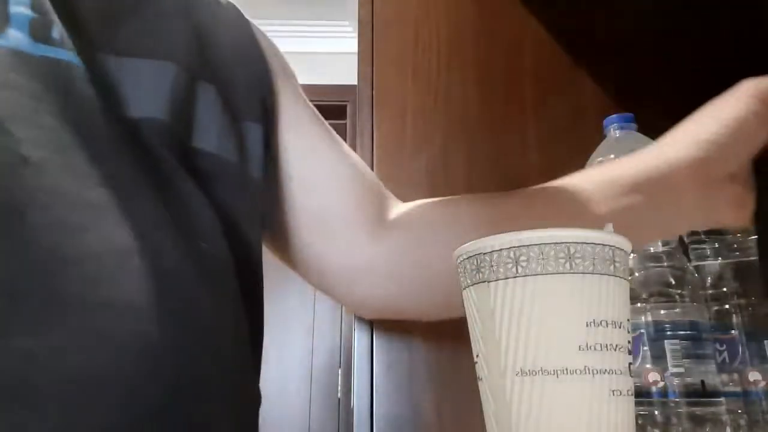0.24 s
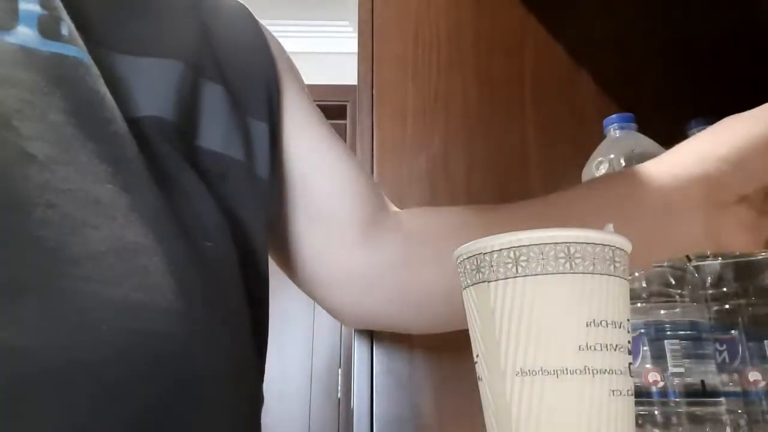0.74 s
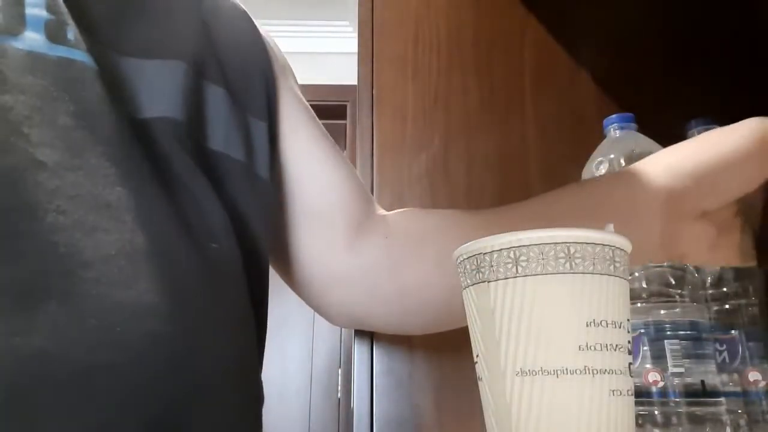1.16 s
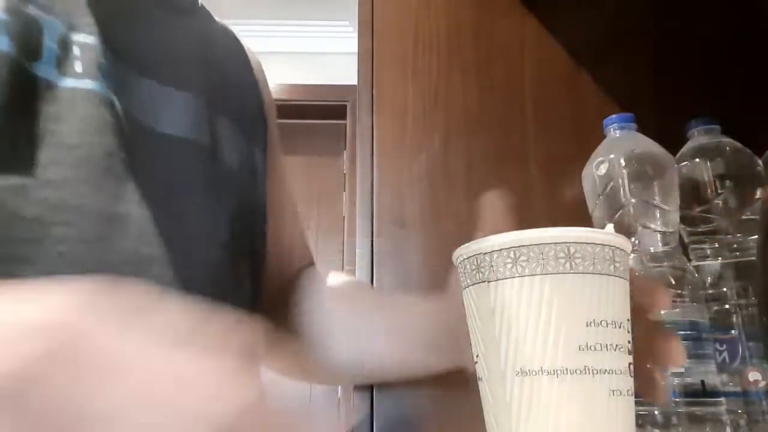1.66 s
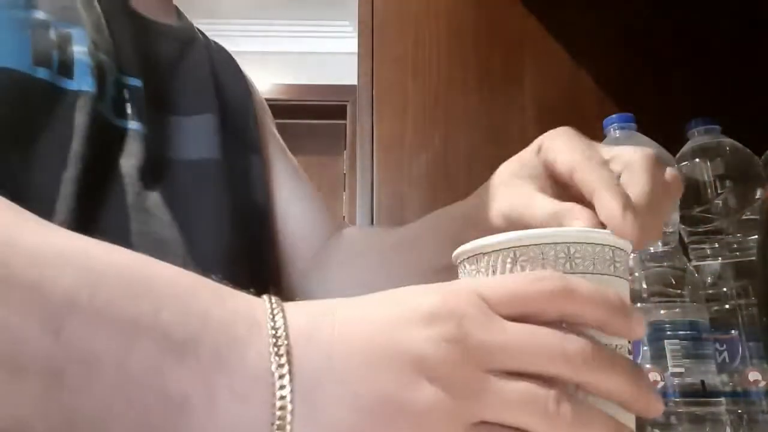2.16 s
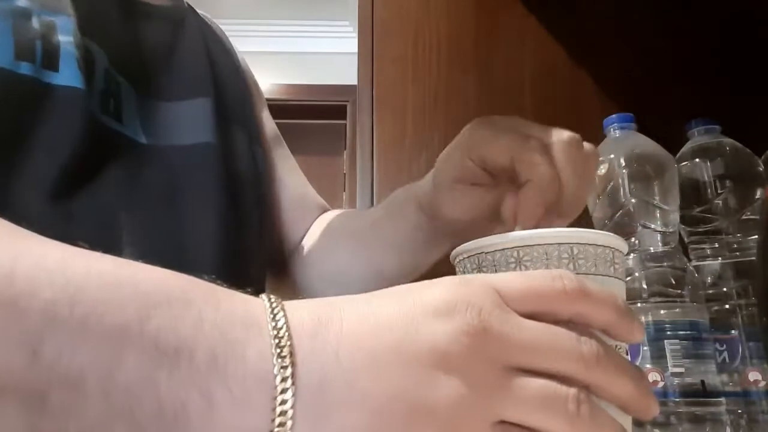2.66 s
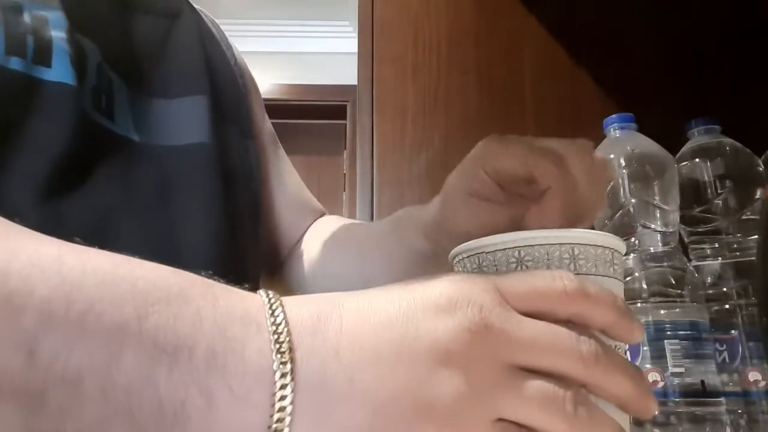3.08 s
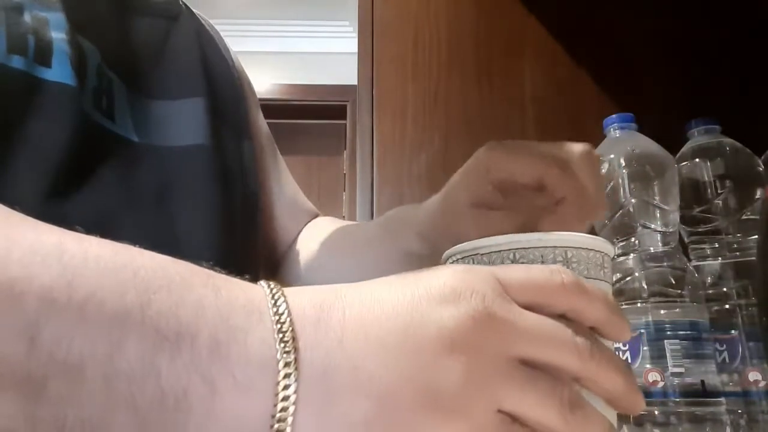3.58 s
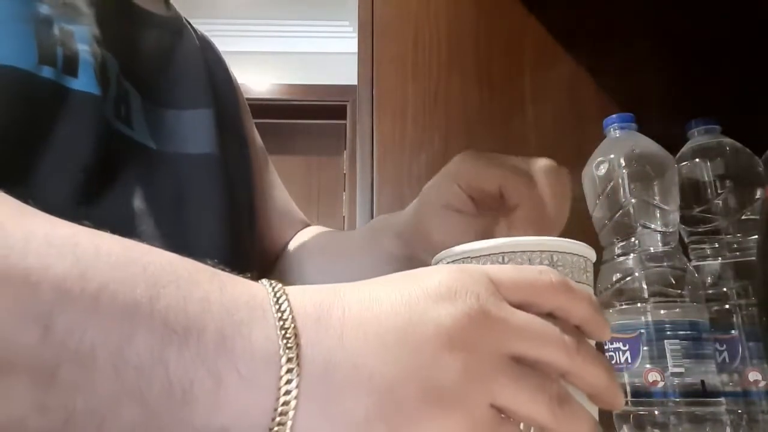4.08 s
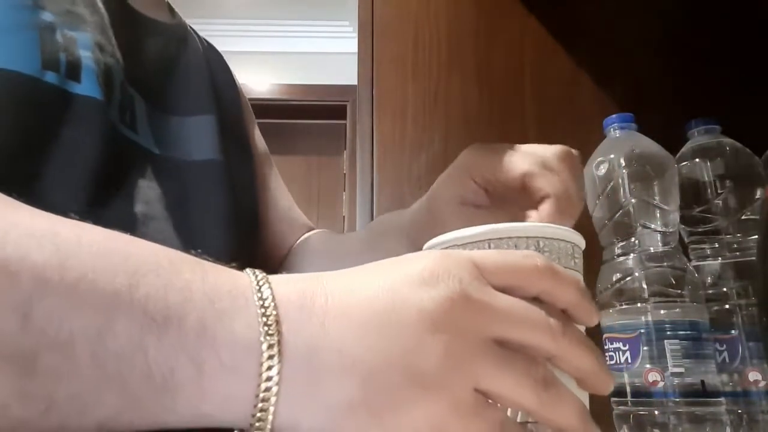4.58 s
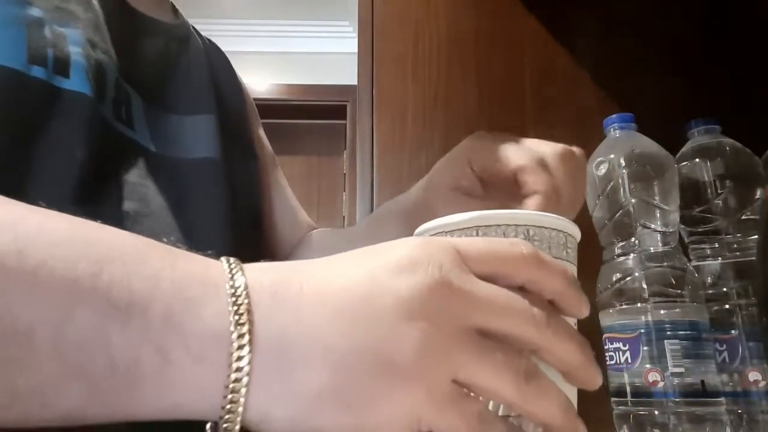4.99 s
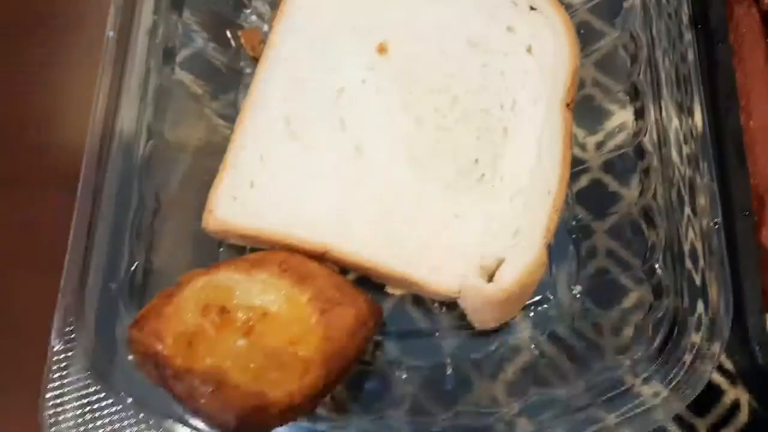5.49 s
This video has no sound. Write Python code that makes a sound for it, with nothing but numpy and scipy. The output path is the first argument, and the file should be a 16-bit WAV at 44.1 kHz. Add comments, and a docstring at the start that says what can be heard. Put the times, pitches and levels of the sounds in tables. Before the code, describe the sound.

A metal kettle clatters and thumps onto its base, then a light stick softly stirs water in a paper cup, ending on an abruptly cut knock.

```python
"""At a wooden counter in a small furnished room, a metal electric kettle is fumbled onto its base until it seats.
Each blow layers noise clatter, ringing shell modes and a counter thump; small rattles and slides lie between.
Then water in a paper cup is stirred with a light stick: friction noise and fibre snaps on the wall,
small dull taps, spatters and decaying-sine bubbles. Filtered noise makes the low ventilation rumble and faint hiss.
One last hard knock is cut short as the sound breaks off, then returns much quieter."""
import sys
import numpy as np
from scipy import signal
from scipy.fft import irfft
from scipy.io import wavfile
from scipy.ndimage import uniform_filter1d

SR = 44100
rng = np.random.default_rng(int(sys.argv[2]) if len(sys.argv) > 2 else 0)


def waveform_to_disk(signal):
    """Save audio, clipped to [-1, 1], as 16-bit WAV at the path in sys.argv[1]."""
    frames = np.transpose(np.atleast_2d(signal))
    scaled = np.clip(frames, -1, 1) * 32767
    samples = np.round(scaled).astype(np.int16)
    wavfile.write(sys.argv[1], SR, samples)


N = 253115
TIME = np.arange(N) / SR
SHARP_RISE_S = 0.0005  # onset of the hardest contacts

# likeness of the left and right channels: (frequency [Hz], likeness [0-1])
STEREO_LIKENESS = [(60, 0.98), (300, .93), (700, 0.67), (1300, 0.021), (3000, .15), (7000, 0.013)]
# stereo balance on the kettle side: (frequency [Hz], left minus right [dB])
KETTLE_LEAN = [(60, -2), (600, -3), (1200, 4.5), (2400, 1.5), (8000, 0.5)]
# stereo balance on the cup side: (frequency [Hz], left minus right [dB])
CUP_SIDE_LEAN = [(60, -6), (600, -7.5), (1300, 2.5), (2400, 6), (4400, -0.5), (8000, -0.5)]
# noise colour of the base's clatter: (frequency [Hz], density [dB per Hz])
CLATTER_COLOUR = [(100, -19.5), (190, -15.5), (270, 5), (440, 2), (700, -9.5), (930, -3.5), (1300, -19),
                  (1700, -13.5), (2650, -13.5), (3050, -23.5), (3900, -23), (8200, -26.5), (9400, -46),
                  (11500, -34), (15500, -47.5)]
# noise colour of rubbed paper: (frequency [Hz], density [dB per Hz])
PAPER_COLOUR = [(240, -19), (420, -4), (780, -5), (1100, -1.5), (2300, -6.5), (2900, -11), (3500, -4),
                (4500, -11.5), (8200, -10), (9300, -28.5), (11500, -21), (15500, -30.5)]
# noise colour of the cabinet under the counter: (frequency [Hz], density [dB per Hz])
CABINET_COLOUR = [(30, -24), (65, -1), (130, 0), (220, -21), (600, -55.5)]


def amp(db):
    """Decibels to gain."""
    return 10 ** (np.asarray(db) / 20)


def unit(x):
    """Scales to rms 1."""
    return x / np.sqrt(np.mean(x ** 2) + 1e-20)


def at_hz(points, hz):
    """Reads a table on a log-frequency axis."""
    f, value = np.transpose(points)
    return np.interp(np.log(hz + 1), np.log(f + 1), value)


def level(points):
    """Turns (time [s], level [dB]) points into a gain for every sample."""
    return amp(np.interp(TIME, *np.transpose(points)))


def add(mix, s, sound):
    """Mixes a sound into the stereo mix at time s, in place."""
    part = mix[:, round(s * SR):][:, :sound.shape[1]]
    part += sound[:, :part.shape[1]]


def tilt(hz, slope):
    """Brightness of a contact: slope dB per octave around 800 Hz, flat outside 300-8000 Hz."""
    return amp(slope * np.log2(np.clip(hz, 300, 8000) / 800))


def noise(colour, size, lean, slope=0):
    """Coloured stereo noise at rms 1, whose channels agree mostly in the bass."""
    hz = np.fft.rfftfreq(size, 1 / SR)
    a, b = np.exp(2j * np.pi * rng.random((2, len(hz))))  # random phases
    same = np.clip(at_hz(STEREO_LIKENESS, hz), -1, 1)
    pair = np.array([a, same * a + np.sqrt(1 - same ** 2) * b])
    balance = amp(np.outer([0.5, -0.5], at_hz(lean, hz)))
    low_cut = hz ** 2 / (hz ** 2 + (colour[0][0] / 2) ** 2)
    spectrum = amp(at_hz(colour, hz)) * tilt(hz, slope) * low_cut
    return unit(irfft(pair * balance * spectrum, size))


def burst(colour, lean, slope, t60, rise, size=16384):
    """A contact heard as dense resonances: coloured noise that swells at once and dies together."""
    t = np.arange(size) / SR
    return noise(colour, size, lean, slope) * amp(-60 * t / t60) * (1 - np.exp(-t / rise))


def ring(modes, slope, rise, damping=1, uneven_db=0, size=16384):
    """Struck modes as decaying sines, detuned at random, with uneven_db varying their strength by the spot hit."""
    t, out = np.arange(size) / SR, np.zeros((2, size))
    for hz, db, t60 in modes:
        start, detune, apart, spot = rng.uniform(-1, 1, 4)
        # the less alike the channels, the further apart their phases
        spread = np.arccos(np.clip(at_hz(STEREO_LIKENESS, hz), -1, 1)) * np.sign(apart)
        phase = np.pi * start + np.array([[0], [spread]])
        wave = np.sin(2 * np.pi * hz * (1 + 0.0076 * detune) * t + phase)
        balance_db = np.array([[0.5], [-0.5]]) * at_hz(KETTLE_LEAN, hz)
        decay_db = -60 * damping * t / t60
        out += wave * amp(db + uneven_db * spot + decay_db + balance_db) * tilt(hz, slope)
    return out * (1 - np.exp(-t / rise))


def grain(rough_db, size):
    """A random gain that wanders at rms 1, smoothed over size samples."""
    drift = unit(uniform_filter1d(rng.standard_normal(N), size))
    return unit(amp(rough_db * np.clip(drift, -2.5, 2.5)))


def wander(x, patchy_db):
    """Makes different parts of the spectrum stand out from moment to moment, by smoothed random patches."""
    z = signal.stft(x, SR, nperseg=512)[2]
    patches = uniform_filter1d(rng.standard_normal(z.shape[1:]), size=4, axis=0)  # across frequency
    patches = unit(uniform_filter1d(patches, size=7, axis=1))  # across time
    return signal.istft(z * amp(patchy_db * patches), SR, nperseg=512)[1][:, :N]


def room(x, wet_db):
    """Adds the diffuse tail of a small furnished room: noise that decays at its own rate in each band."""
    # reverberation time: (frequency [Hz], t60 [s])
    reverb_t60 = [(100, 0.16), (400, 0.4), (1500, 0.2)]
    flat = [(60, 0), (16000, 0)]
    wash = noise(flat, 32768, flat)
    hz, t, z = signal.stft(wash, SR, nperseg=256)
    decay = amp(-60 * t / at_hz(reverb_t60, hz)[:, None])
    build_up = 1 - np.exp(-t / 0.0078)
    tail = signal.istft(z * decay * build_up, SR, nperseg=256)[1]
    tail = tail / np.linalg.norm(tail[0])
    return x + amp(wet_db) * signal.fftconvolve(x, tail, axes=1)[:, :N]


def ventilation():
    """A low rumble of filtered noise that swells a little by chance, with a faint drifting hiss above it."""
    # rumble colour: (frequency [Hz], density [dB per Hz])
    air_colour = [(12, -44), (20, -11), (80, 3), (119, 3), (185, -19.5), (315, -14), (452, -29), (857, -33),
                  (1270, -46), (2540, -47), (4550, -56), (9130, -56), (15500, -48.5)]
    # hiss colour: (frequency [Hz], density [dB per Hz])
    hiss_colour = [(5500, -25), (7900, -0.5), (9500, -24.5)]
    # drift of the hiss: (time [s], level [dB])
    hiss_drift = [(1.45, -1), (1.62, 6), (1.85, 0)]
    bass_db, upper_db, hiss_db = -54, -52.5, -88.5
    rumble = noise(air_colour, N, CUP_SIDE_LEAN)
    bass = signal.sosfiltfilt(signal.butter(2, 250, fs=SR, output="sos"), rumble)
    swell = grain(rough_db=1.38, size=round(0.4 * SR))
    hiss = amp(hiss_db) * level(hiss_drift) * noise(hiss_colour, N, CUP_SIDE_LEAN)
    upper = amp(upper_db) * (rumble - bass)
    return amp(bass_db) * bass * swell + wander(upper + hiss, patchy_db=3.5)


def stroke(length, taper, build_db=0):
    """Pressure that swells, holds or changes by build_db, and lets go."""
    size = int(length * SR)
    return signal.windows.tukey(size, np.clip(taper, 0, 1)) * amp(build_db * np.linspace(-0.5, 0.5, size))


def crackle(size):
    """Single fibres snap under friction: sparse random impulses of uneven strength."""
    snaps_per_s, spread_db = 700, 2
    snaps = (rng.random(size) < snaps_per_s / SR) * np.sign(rng.standard_normal(size))
    return snaps * amp(spread_db * np.minimum(rng.exponential(1, size), 3))


def rub(rows, taper, build_db=0):
    """Friction noise and snapping fibres under each stroke's pressure, with a weaker trail as contact lets go."""
    trail_s, trail_db, crackle_db = 0.052, -16.5, -1
    keep = np.exp(-1 / (trail_s * SR))
    out = np.zeros((2, N))
    for s, length, db, slope in rows:
        pressure = np.pad(stroke(length, taper, build_db), (0, 16384))[:16384]
        size = len(pressure)
        trail = amp(trail_db) * signal.lfilter([1 - keep], [1, -keep], pressure)
        snap = burst(PAPER_COLOUR, CUP_SIDE_LEAN, slope, t60=0.019, rise=SHARP_RISE_S / 2)
        fibres = unit(signal.oaconvolve(crackle(size)[None], snap, axes=1)[:, :size])
        smooth = noise(PAPER_COLOUR, size, CUP_SIDE_LEAN, slope)
        add(out, s, amp(db) * (pressure + trail) * unit(smooth + amp(crackle_db) * fibres))
    return out


def sliding():
    """The kettle and the hand on it rub briefly: short friction strokes with the paper's noise colour."""
    # rubs: (start [s], length [s], relative level [dB], brightness [dB per octave])
    slides = [(0.015, 0.04, -67.5, -3.5), (0.36, 0.04, -68.5, -1), (0.968, 0.014, -46, -4.5),
              (1.335, 0.095, -54.5, 1)]
    return amp(-2.5) * room(rub(slides, taper=0.93), wet_db=-15.0)


def stick_pickup():
    """The stick is lifted off the counter and clicks with three short woody modes."""
    out = np.zeros((2, N))
    modes = [(1520, 0.5, 0.026), (1936, -3.0, 0.019), (2520, 1.5, 0.015)]  # (frequency [Hz], level [dB], t60 [s])
    add(out, 2.202, amp(-44.5) * ring(modes, 0, rise=0.00042))
    return room(out, wet_db=-5.5)


def last_knock():
    """One hard, close knock: a dry noise burst and a hollow modal ring."""
    # knock colour: (frequency [Hz], density [dB per Hz])
    knock_colour = [(220, -25), (520, 1.5), (800, -7.5), (1080, 1.5), (1350, -8), (2000, -7), (2750, -24.5),
                    (7940, -23), (15000, -60)]
    # hollow ring: (frequency [Hz], level [dB], t60 [s])
    hollow_modes = [(313, -5.5, 0.11), (558, 7, 0.03), (658, 3, 0.07), (1052, 4, 0.033), (1990, -10, 0.025)]
    out = np.zeros((2, N))
    hollow = ring(hollow_modes, 0, rise=SHARP_RISE_S)
    impact = burst(knock_colour, KETTLE_LEAN, 0, t60=0.065, rise=SHARP_RISE_S)
    add(out, 5.456, amp(-26.5) * impact + amp(-30.5) * hollow)
    return out


def cup(x):
    """The paper wall adds a few damped resonances, as peak filters beside the direct sound."""
    # wall resonances: (frequency [Hz], width [Hz], level over the plain sound [dB])
    wall_modes = [(1120, 34, -7.5), (1660, 250, -5.5), (2440, 180, -4.5), (3320, 160, -1), (3680, 140, -5)]
    out = x
    for hz, width, db in wall_modes:
        out = out + amp(db) * signal.lfilter(*signal.iirpeak(hz, hz / width, fs=SR), x)
    return out


def small_taps():
    """Small dull taps, as short noise bursts through the cup filter."""
    # light contacts before the stirring, the stick's pickup click, then stick taps on the cup:
    # (time [s], relative level [dB], brightness [dB per octave])
    taps = [(0.321, -49.5, -7), (1.801, -50.5, -10.5), (2.202, -44, 0), (3.079, -38.5, -6),
            (3.31, -39.5, -4), (3.434, -46.5, -4.5), (3.534, -48.5, -0.5), (3.654, -35, -3),
            (3.973, -34.5, -2), (4.204, -54, -0.5), (4.232, -45, -1), (4.358, -41.5, -1),
            (4.701, -45.5, -3), (5.261, -44.5, -6.5), (5.434, -50, 1)]
    # tap colour: (frequency [Hz], density [dB per Hz])
    tap_colour = [(200, -5), (500, -8.5), (1000, -0.5), (1500, -2.5), (2300, -6.5), (2900, -11.5),
                  (3700, -7.5), (6000, -10.5), (8200, -8), (9400, -31.5), (15000, -24)]
    out = np.zeros((2, N))
    for s, db, slope in taps:
        add(out, s, amp(db) * burst(tap_colour, CUP_SIDE_LEAN, slope, t60=0.057, rise=0.0014))
    return amp(-5.0) * room(cup(out), wet_db=-7.0)


def bubble(hz, cycles, glide):
    """A trapped bubble is a sine that dies in a few cycles, its pitch bent slightly up as it nears the surface."""
    t = np.arange(4096) / SR
    age = t * hz / cycles
    wave = np.sin(2 * np.pi * hz * t * (1 + glide * np.minimum(age, 1)))
    return wave * np.exp(-age) * (1 - np.exp(-t * hz))


def water():
    """Water laps as rough noise; each splash is a short spatter and a bubble, with faint bubbles later on."""
    # water colour: (frequency [Hz], density [dB per Hz])
    water_colour = [(300, 17.5), (600, 0.5), (1600, 3.5), (2800, -13.5), (3350, -5.5), (4700, -25.5),
                    (15000, -27)]
    # splashes: (time [s], level [dB], bubble frequency [Hz])
    splashes = [(2.675, -40.5, 466), (2.688, -43, 660), (2.749, -51, 1090), (2.799, -39.5, 1140),
                (2.841, -40.5, 1256), (2.881, -42, 1180), (3.122, -47.5, 1430), (5.219, -50, 1713)]
    out = np.zeros((2, N))
    # the first turn sets the water moving
    add(out, 2.635, amp(-62) * stroke(0.233, taper=0.28)[None])
    out *= noise(water_colour, N, CUP_SIDE_LEAN) * grain(rough_db=4.5, size=300)
    for s, db, hz in splashes:
        spatter = amp(-8) * burst(water_colour, CUP_SIDE_LEAN, 0, t60=0.035, rise=0.0012)[:, :4096]
        plop = amp([[0], [2]]) * bubble(hz, cycles=2.0, glide=0.0048)  # 2 dB stronger on the right
        add(out, s, amp(db) * (spatter + plop))
    drip_count, first_s, last_s = 69, 3.442, 5.35
    for _ in range(drip_count):
        when = rng.uniform(first_s, last_s)
        strength, pitch = rng.uniform(-0.44, 1, 2)
        drip = bubble(1300 * 2 ** (0.45 * pitch), cycles=1.0, glide=0.019)
        add(out, when, amp(-65 + 2.5 * strength) * drip[None])
    return room(out, wet_db=-9.0)


def catches():
    """The stick's edge catches on paper fibres: brief random jolts on a steady gain, at rms 1."""
    catches_per_s, decay_s, jolt_db = 180, 0.0012, 2
    jolts = (rng.random(N) < catches_per_s / SR) * rng.random(N)
    return unit(1 + amp(jolt_db) * signal.lfilter([1], [1, -np.exp(-1 / (decay_s * SR))], jolts))


def scraping():
    """The stick drags lightly on the paper and presses in strokes, each pushing the cup against the counter."""
    # strokes: (start [s], length [s], relative level [dB], brightness [dB per octave])
    strokes = [(2.293, 0.082, -65, 4), (2.638, 0.071, -63, -6), (3.008, 0.11, -61, 0),
               (3.19, 0.08, -53, -1), (3.231, 0.057, -48.5, -3), (3.331, 0.11, -54.5, -2),
               (3.535, 0.11, -51.5, -1), (3.663, 0.11, -63.5, 10), (3.879, 0.065, -53, -1),
               (4.035, 0.083, -51.5, 0), (4.224, 0.12, -55.5, -1.5), (4.362, 0.096, -56, 0),
               (4.562, 0.092, -54.5, -1.5), (4.633, 0.079, -63.5, -1), (4.723, 0.068, -54, 1),
               (4.95, 0.057, -68, -4.5), (5.048, 0.06, -55, 2.5), (5.215, 0.082, -70, -6.5)]
    # light drag under the strokes: (time [s], relative level [dB])
    drag_level = [(2.15, -105), (2.22, -71.5), (2.6, -86), (3.2, -75.5), (3.85, -67), (4.5, -88.5),
                  (5.4, -88)]
    push_db = -12.5
    drag = noise(PAPER_COLOUR, N, CUP_SIDE_LEAN, slope=0.8) * level(drag_level)
    friction = drag + rub(strokes, taper=0.82, build_db=-2)
    push = np.zeros((2, N))
    for s, length, db, _ in strokes:
        thump = burst(CABINET_COLOUR, CUP_SIDE_LEAN, 0, t60=0.18, rise=length / 2)
        add(push, s, amp(db + push_db) * thump)
    stick_slip = friction * grain(rough_db=1.0, size=300) * catches()
    # the contact point travels along the wall
    moving = wander(stick_slip, patchy_db=3.5)
    return amp(-4.5) * room(cup(moving), wet_db=-8.5) + push


def rattle():
    """The loose, rocking kettle makes small irregular contacts: short clatter bursts of varied brightness."""
    # rattles: (start [s], length [s], reference level [dB])
    rattles = [(0.734, 0.09, -41), (1.05, .06, -30), (1.261, .04, -44)]
    taps_per_s, spread_db, t60_s = 110, 6, 0.028
    out = np.zeros((2, N))
    for start, length, db in rattles:
        count = round(taps_per_s * length)
        for k, (late, strength, spot) in enumerate(rng.random((count, 3))):
            tap = burst(CLATTER_COLOUR, KETTLE_LEAN, 2 * spot - 1, t60_s, rise=SHARP_RISE_S, size=4096)
            tap_db = db + spread_db * (2 * strength - 1.5)
            add(out, start + length * (k + late) / count, amp(tap_db) * tap)
    return room(out, wet_db=-14.5)


def clack(hz):
    """A short cluster of rim resonances: a noise burst in a narrow band around one pitch."""
    edge = 2 ** 0.22  # the band is 10 dB down 0.22 octave either side
    band = [(100, -50), (hz / edge ** 2, -26), (hz / edge, -10), (hz, 0),
            (hz * edge, -10), (hz * edge ** 2, -26), (16000, -70)]
    return burst(band, KETTLE_LEAN, 0, t60=0.063, rise=SHARP_RISE_S)


def kettle():
    """Each blow clatters the plastic base, rings the shell and thumps the counter, whose cabinet booms on."""
    # blows: (time [s], level [dB], brightness [dB per octave], clack pitch [Hz], thin wall ring [dB], clack [dB])
    blows = [(0.602, -19.5, -1.5, 439.7, 3.5, -1.5), (0.669, -22.5, -3, 902.5, -6, -3.5),
             (0.709, -25, -3.5, 899.5, -8.5, -8), (0.744, -24.5, -3.5, 430, -3.5, 1.5),
             (0.766, -23, 1, 1085, -2.5, -4), (0.798, -24, -4, 900, 0, 0.5),
             (0.825, -32.5, -7, 450, -7, -2.5), (0.987, -29.5, -1, 1006, 0, 2.5),
             (1.037, -9.5, 0.5, 1608, 5, -6.5), (1.042, -16.5, -0.5, 170, 2, 6),
             (1.057, -20.5, 0, 882, -1, -4.5), (1.069, -26, -4, 420, -8.5, -6.5),
             (1.121, -18, 0.5, 905, -9, -5), (1.194, -28.5, -1, 910, -11, -13),
             (1.249, -24.5, -1.5, 1930, -2, -5)]
    # shell and base modes: (frequency [Hz], level [dB], t60 before damping [s])
    shell_modes = [(196, -15, 0.2), (259.4, -1, .18), (415, -3, 0.15), (528, -10, 0.22), (705, -11, 0.19),
                   (884, -3, 0.15), (1140, -13, 0.16), (1470, -12.5, 0.13), (2365, -18, 0.1),
                   (2557, -7.5, 0.13), (2810, -10, 0.06), (3660, -21, 0.08)]
    # the base's dull clunk: (frequency [Hz], level [dB], t60 [s])
    clunk_modes = [(311, -2.5, .055)]
    # modes of the counter's boards: (frequency [Hz], level [dB], t60 [s])
    board_modes = [(78.2, -3, 0.26), (110, -11, 0.21), (154, -13.5, 0.055)]
    # weight on the counter: it lands fully, then the hand carries it into its seat: (time [s], thud level [dB])
    thud_level = [(0.69, -0.5), (0.78, 2.5), (0.95, -8), (1.04, -13.5), (1.26, -4.5)]
    # metal cracking against the base's rim: (frequency [Hz], density [dB per Hz])
    crack_colour = [(500, -13.5), (1600, -4), (2600, 2), (3100, -13.5), (3800, 0.5), (5000, -10.5),
                    (8200, -16), (9500, -30.5), (15000, -34.5)]
    firm_db, firm_doubling_db = -20.5, 8.5  # louder blows press the kettle down and die sooner
    thin_wall_hz = 2000  # modes above this belong to the shell's thin wall
    rebound_s, rebound_db, boom_db = 0.0091, -11.5, -12.5
    out = np.zeros((2, N))
    for s, db, slope, clack_hz, wall_db, clack_db in blows:
        # firm contact shortens the clatter and damps the shell alike
        firm = 2 ** (max(db - firm_db, 0) / firm_doubling_db)
        clatter = amp(-5.5) * burst(CLATTER_COLOUR, KETTLE_LEAN, slope, t60=0.15 / firm, rise=2 * SHARP_RISE_S)
        modes = [(hz, mode_db + wall_db * (hz > thin_wall_hz), t60) for hz, mode_db, t60 in shell_modes]
        shell = amp(-5) * ring(modes, slope, rise=0.0008, damping=1.3 * firm, uneven_db=1)
        clunk = ring(clunk_modes, 0, rise=0.0046) / firm
        # where the kettle lands sets the pitch of a short clack
        rim = amp(clack_db - 4.5) * clack(clack_hz)
        thud = amp(np.interp(s, *np.transpose(thud_level))) * ring(board_modes, 0, rise=0.0091)
        # the crack grows faster than the blow: 1.4 dB more for each dB of force
        crack_db = -16 + 1.4 * (db - firm_db)
        crack = amp(crack_db) * burst(crack_colour, KETTLE_LEAN, 0, t60=0.012, rise=SHARP_RISE_S)
        add(out, s, amp(db) * (clatter + shell + clunk + rim + thud + crack))
        # the loose base chatters once after each blow
        rebound = burst(CLATTER_COLOUR, KETTLE_LEAN, slope + 2.7, t60=0.035, rise=0.00097)
        add(out, s + rebound_s, amp(db + rebound_db) / firm * rebound)
        boom = burst(CABINET_COLOUR, KETTLE_LEAN, 0, t60=0.16, rise=0.033)
        add(out, s, amp(db + boom_db) / firm * boom)
    return room(out, wet_db=-14)


def scene():
    """Everything on and around the counter, over the ventilation."""
    background = ventilation()
    stirring = stick_pickup() + scraping() + water()
    return background + sliding() + small_taps() + stirring + last_knock() + rattle() + kettle()


def record(dry):
    """Microphone low cut and hiss, the break in level near the end, rounded peaks and a steep treble limit."""
    # overall gain, which breaks off and returns lower: (time [s], level [dB])
    break_level = [(5.47, 4), (5.472, -10.5), (5.50, -35), (5.575, -58), (5.60, -27), (5.65, -8.5)]
    low_cut_hz, treble_limit_hz = 38.4, 15400
    heard = signal.sosfilt(signal.butter(2, low_cut_hz, "highpass", fs=SR, output="sos"), dry)
    hiss = amp(-94) * rng.standard_normal((2, N))
    rounded = np.tanh((heard + hiss) * level(break_level))
    treble_limit = signal.firwin(511, treble_limit_hz, window=("kaiser", 9), fs=SR)
    return signal.oaconvolve(rounded, treble_limit[None], "same")


dry = scene()
out = record(dry)
waveform_to_disk(out)
```